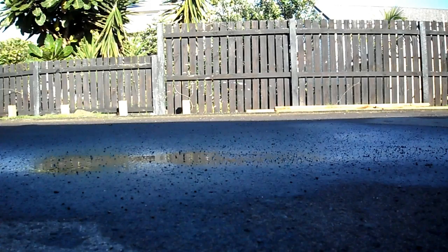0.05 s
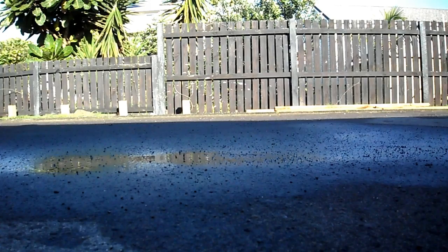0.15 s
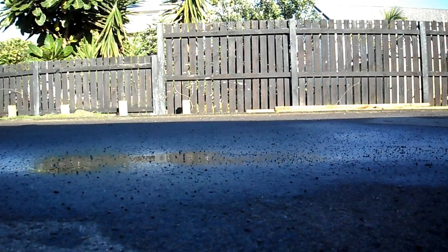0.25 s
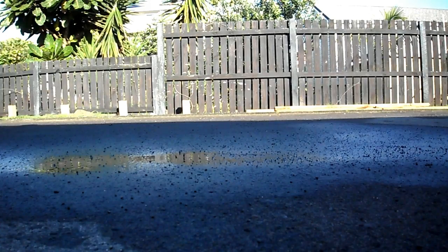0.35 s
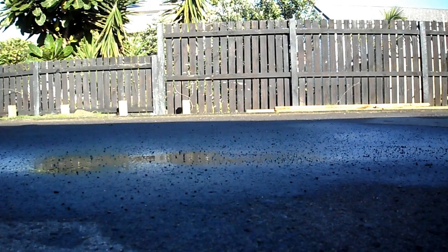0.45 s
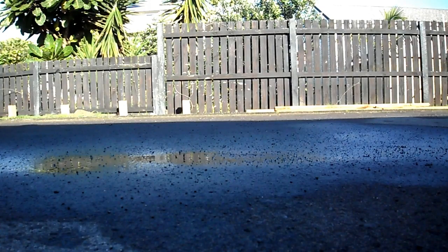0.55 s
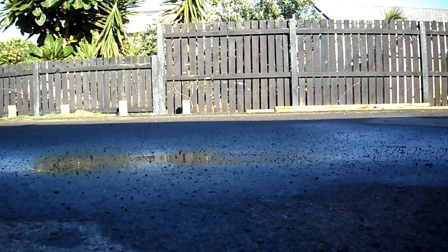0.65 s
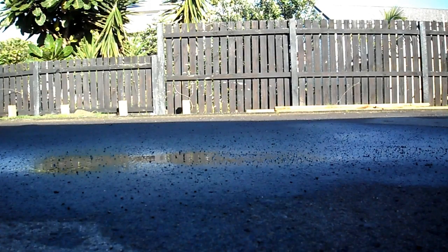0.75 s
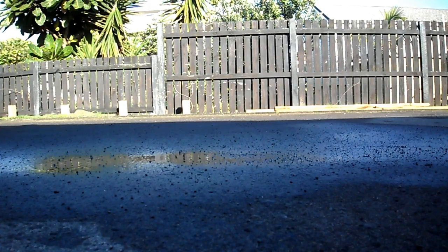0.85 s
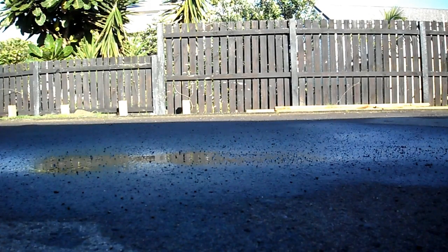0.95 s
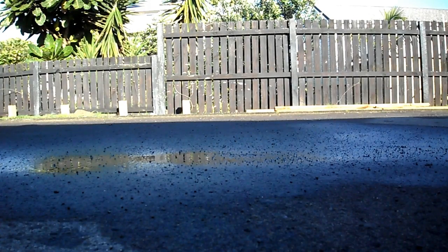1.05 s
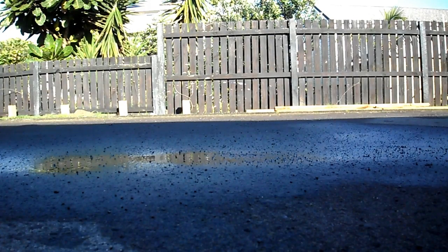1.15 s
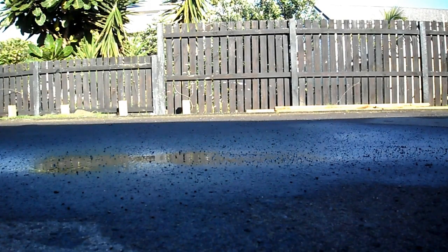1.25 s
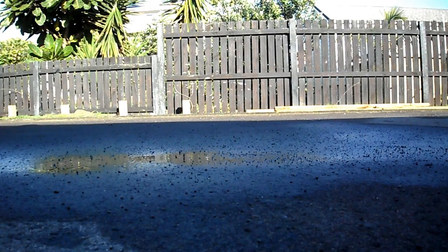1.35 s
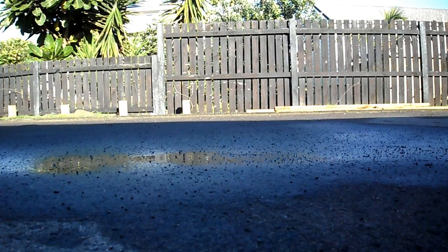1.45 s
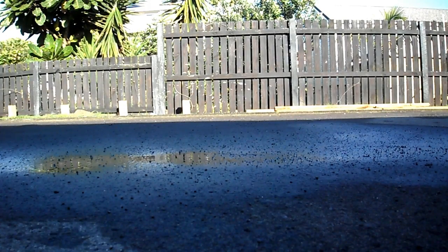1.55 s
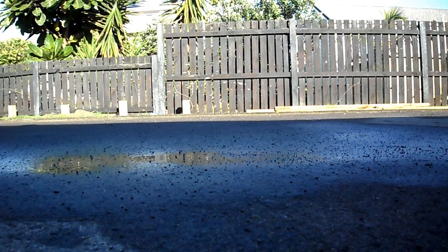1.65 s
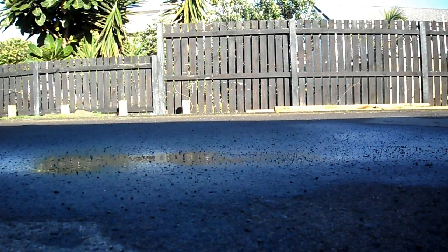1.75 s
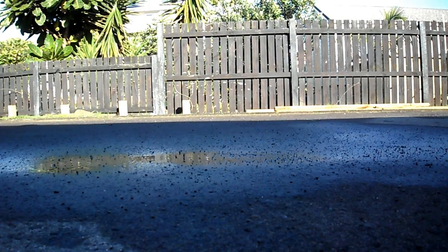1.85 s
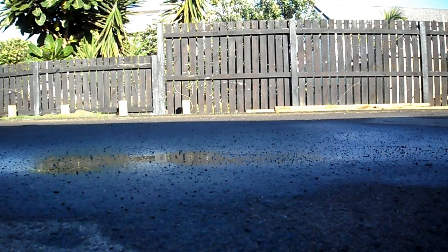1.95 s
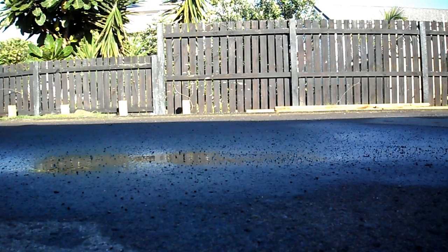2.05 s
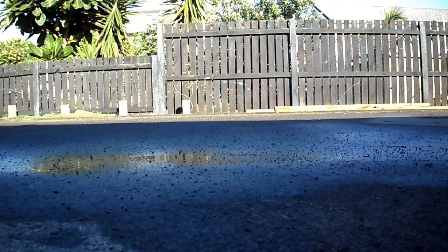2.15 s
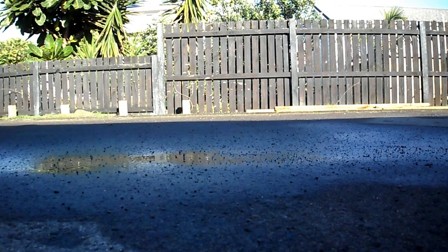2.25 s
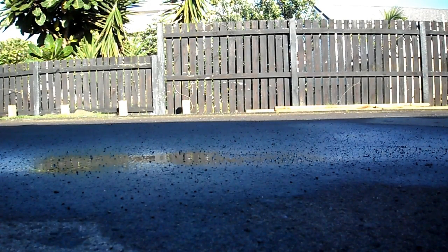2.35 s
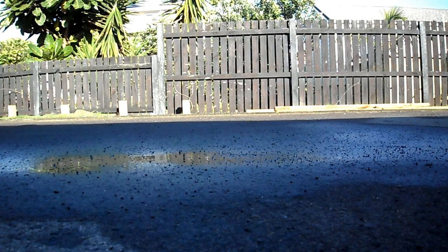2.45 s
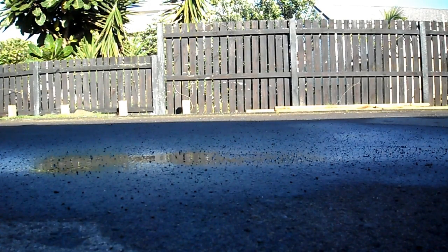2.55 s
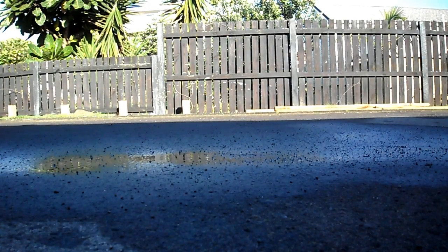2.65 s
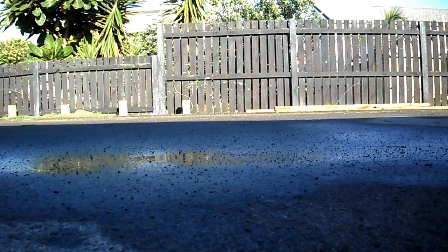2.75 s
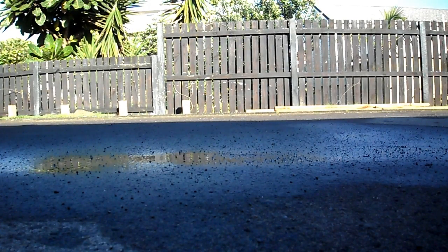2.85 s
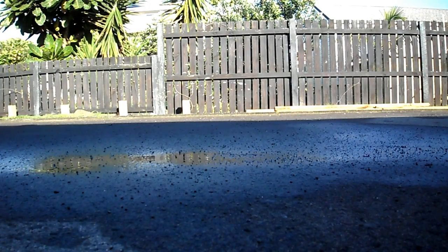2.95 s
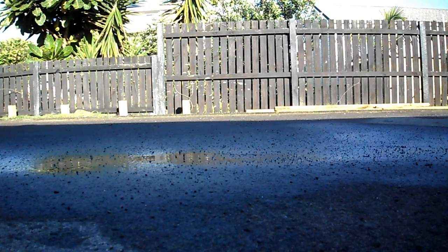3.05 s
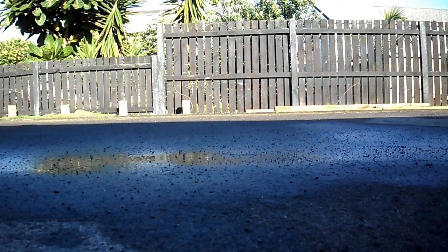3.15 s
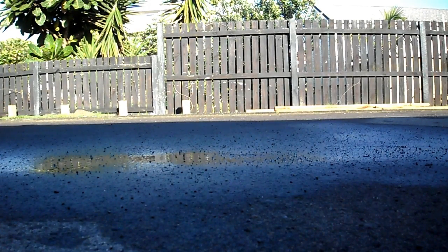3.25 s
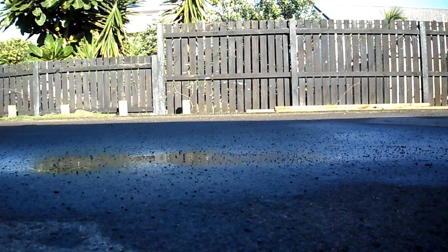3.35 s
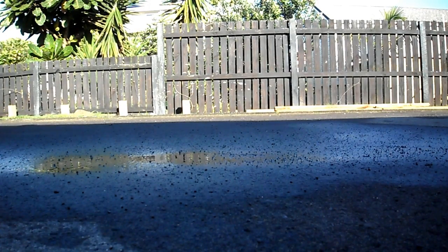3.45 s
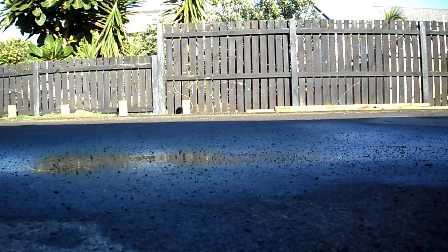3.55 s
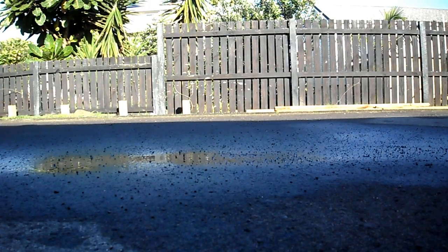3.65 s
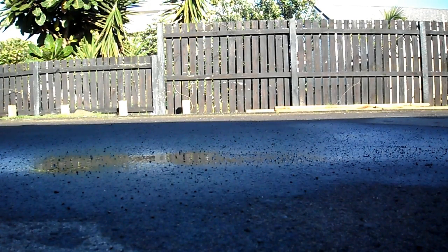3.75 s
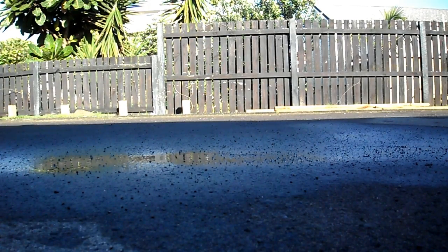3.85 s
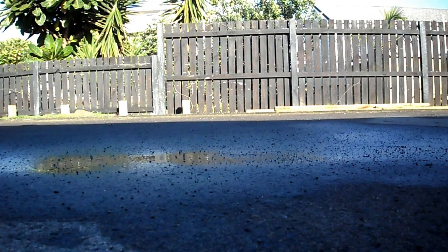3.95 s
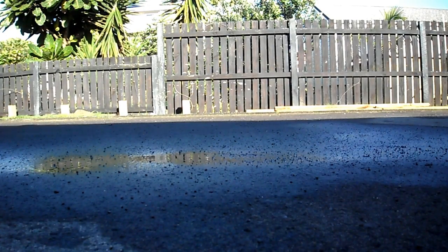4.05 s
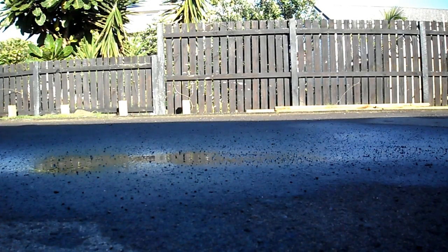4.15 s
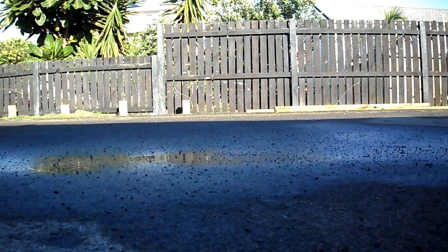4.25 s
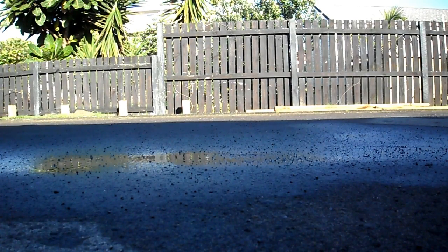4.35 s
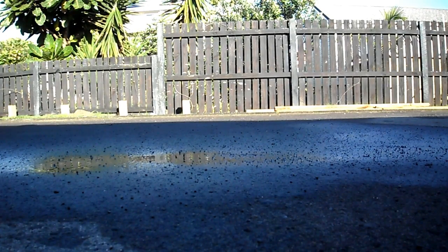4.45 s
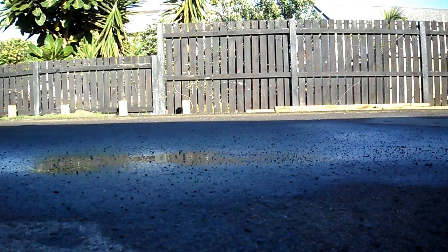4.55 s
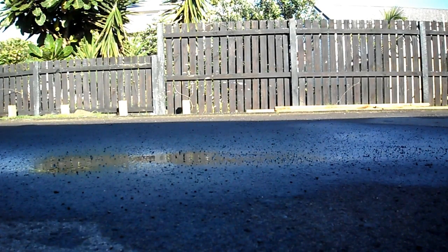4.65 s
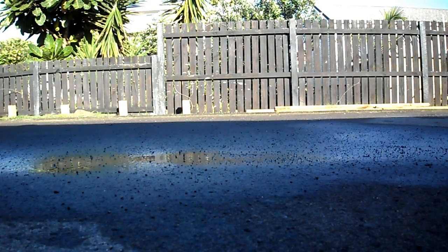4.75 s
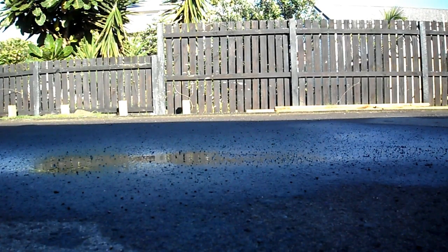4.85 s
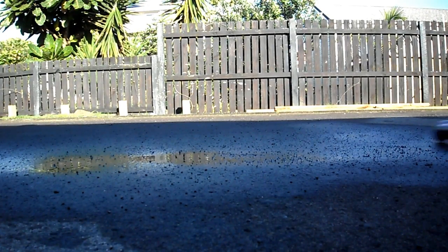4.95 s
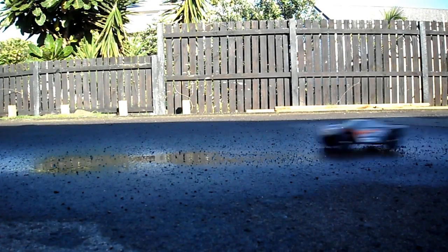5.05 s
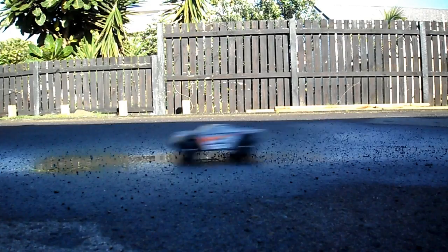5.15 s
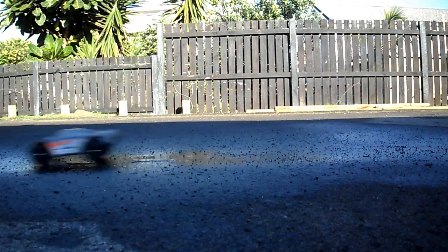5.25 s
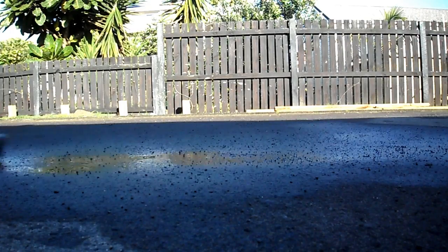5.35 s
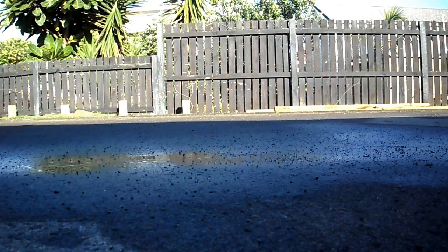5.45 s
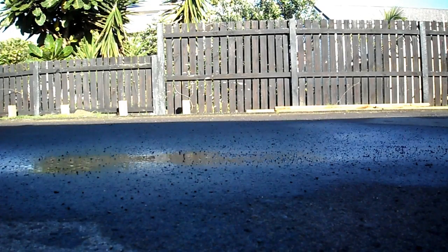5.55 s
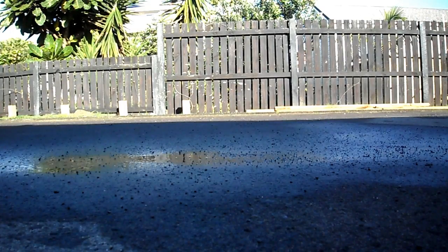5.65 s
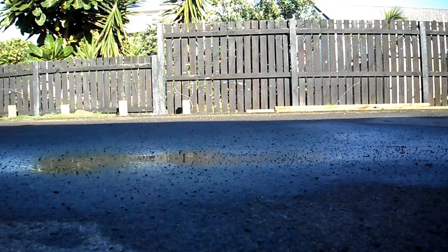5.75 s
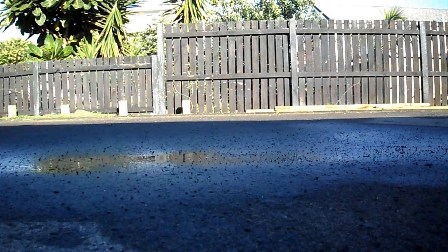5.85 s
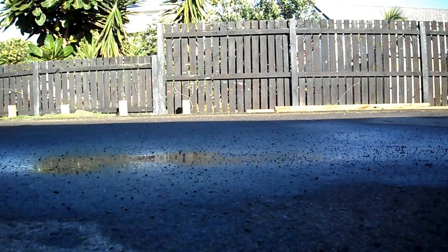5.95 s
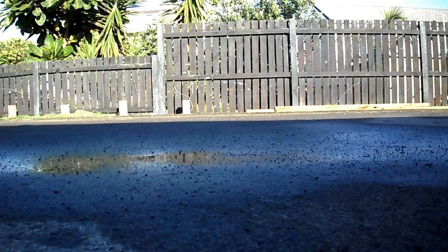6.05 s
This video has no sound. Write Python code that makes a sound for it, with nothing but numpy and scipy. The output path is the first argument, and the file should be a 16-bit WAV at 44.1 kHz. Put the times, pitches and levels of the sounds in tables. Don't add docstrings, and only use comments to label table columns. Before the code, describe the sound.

A quiet open yard, with soft low town rumble and faint hiss throughout. From 0 to 0.6 s a small electric model truck far away revs upward, a thin gear whine with light plastic rattle. Tiny gritty ticks and bird chirps come at about 0.65-1.0 s, then the rattle fades. More quick chirps sound at 2.3-2.9 s. From 3.0 s the whine climbs again, swelling to a high, buzzing pitch by 4.0-4.3 s, dips slightly, and holds steady with a faint controller hum. At 4.8 s tyres break into a piercing, fluttering squeal, strongest near 5.07 s, passing very close until 5.2 s. Dense grit knocks, short squeaks and wet spatter follow, loudest around 5.3 s. At 5.5-5.8 s the whine drops under braking, then shoots up as wheels spin, with scattered knocks and small squeaks to the end just after 6 s. A short dull fence echo trails the sounds.

```python
import sys
import numpy as np
from scipy import signal
from scipy.fft import rfft, irfft
from scipy.io import wavfile
from scipy.ndimage import uniform_filter1d

SR = 44100
rng = np.random.default_rng(int(sys.argv[2]) if len(sys.argv) > 2 else 0)


def voltage_ratio(decibels):
    exponent = np.asarray(decibels, float) / 20
    return 10 ** exponent


def digitize_waveform(pressure):
    field = np.atleast_2d(pressure).T
    bounded = np.clip(field, -1, 1)
    quanta = np.round(bounded * 32767).astype(np.int16)
    wavfile.write(sys.argv[1], SR, quanta)


N = 269010
T = np.arange(N) / SR

# frequency in Hz, level in dB per Hz.
TOWN_SPECTRUM = [(12, -45), (20, -8.5), (107, -1), (246, 0), (442, -3), (888, -9.5), (1020, -9),
                 (1140, -13.5), (1890, -22), (3690, -33), (4120, -46), (5300, -38), (11900, -34),
                 (14500, -32), (15700, -36)]
TOWN_DB = -58

# first stroke in s, last stroke in s, low Hz, high Hz, level in dB.
TRILLS = [
    (.672, .72, 3800, 4700, -66),
    (2.277, 2.307, 2900, 4700, -66.5),
    (2.745, 2.795, 3000, 5000, -70.5),
]
STROKE_S, STROKE_GAP_S, FIRST_STROKE_DROP_HZ = .023, .016, 650
# start in s, length in s, start Hz, end Hz, level in dB.
PEEPS = [ (.75, .03, 4950, 5100, -76), (.66, .03, 2600, 2570, -66), (.735, .025, 2500, 2480, -67),
         (.815, .025, 2520, 2500, -61), (.88, .02, 2550, 2500, -65), (.99, .025, 2600, 2550, -67),
         (2.325, .04, 4400, 4300, -75), (2.365, .012, 3100, 2600, -68), (2.375, .024, 2650, 3600, -64),
         (2.392, .032, 2650, 3750, -63), (2.413, .024, 3300, 3900, -65), (2.505, .03, 4250, 4150, -71),
         (2.575, .04, 4250, 4200, -74), (2.645, .09, 4200, 4150, -79), (2.848, .03, 3150, 4050, -65.5),
         (2.88, .036, 3250, 4450, -65)]

# time in s, level in dB.
HUM = [(2.87, -64), (2.89, -61.5), (3.43, -55), (3.59, -53.5), (4.2, -66), (4.32, -91), (4.42, -48),
       (4.66, -78), (4.751, -41)]
HUM_HZ = 1397

# time in s, peak in dB, chassis knock against it in dB, scatter in s.
GRIT_BUMPS = [(.672, -52, -6, .008), (.752, -55, -6, .01), (.824, -51, -9, .01), (.89, -55, -6, .008),
              (4.349, -45, 3, 0.006), (4.6892, -36, -10, 0.006), (4.7578, -29, -2, 0.006),
              (5.0855, -22, -4, 0.006), (5.223, -20, -3, 0.006), (5.2485, -23, -3, 0.0044),
              (5.2749, -17, 2, 0.0068), (5.29, -23.5, 3, 0.0087), (5.311, -13, -6, 0.0048),
              (5.338, -17, -4.5, 0.0051), (5.365, -15, -3.5, 0.0066), (5.399, -18, 1, 0.0069),
              (5.4344, -25, 9, 0.0068), (5.469, -21.5, 1, 0.006), (5.4984, -46, -5, 0.006),
              (5.5146, -29, 1, 0.0089), (5.5624, -28, 2, 0.0045), (5.6032, -37, 1, 0.005),
              (5.6685, -30, -4, 0.0092), (5.7184, -30, 5.5, 0.0067), (5.8351, -28, -2, 0.0033),
              (5.8994, -40, -7, 0.0052), (5.9738, -38, 0, 0.006), (6.0003, -36, 2, 0.0074)]
GRIT_HISS = [(3500, -31), (5000, -10), (7000, -14), (10000, -23), (13000, -25), (15800, -25)]
SPLASH_DB, SPLASH_S = -29, 0.0058

# start in s, length in s, start Hz, end Hz, level in dB.
SQUEAKS = [ (5.21, .065, 3750, 3500, -35), (5.243, .04, 2550, 2150, -31), (5.392, .024, 3150, 2850, -30),
           (5.425, .022, 2750, 2950, -32), (5.468, .016, 3000, 3600, -33), (5.5, .014, 3800, 4000, -37),
           (5.515, .025, 3000, 3250, -38), (6.028, 0.021, 3110, 3100, -33.5),
           (6.063, 0.0074, 3270, 3010, -23), (6.088, 0.014, 3200, 3050, -33)]
# time in s, pitch in Hz, level in dB.
REAR_TREAD = [(4.95, 3100, -44), (5.02, 2990, -41), (5.035, 3150, -37), (5.052, 2900, -38),
              (5.069, 3050, -42.5), (5.089, 2850, -45), (5.12, 3114, -34.5), (5.161, 3290, -39),
              (5.199, 3140, -56)]
# time in s, pitch in Hz, level in dB.
FRONT_GRIPS = [(4.833, 3124, -24), (4.858, 3150, -27.5), (4.894, 3560, -30.5), (4.922, 3830, -27.5),
               (4.946, 3750, -26), (4.965, 4200, -27), (4.98, 3820, -25), (5.009, 3850, -20.5),
               (5.026, 3950, -24), (5.044, 3880, -19.5), (5.061, 3910, -21.5), (5.074, 3910, -16.5),
               (5.091, 3900, -29), (5.11, 4200, -25), (5.124, 3980, -27), (5.155, 4250, -24),
               (5.187, 3950, -34)]
GRIP_SHARE, GRIP_SAG_HZ = .34, 160
SQUEAL_OCTAVE_DB = -22

# start in s, end in s, resonance in Hz, width in Hz, level in dB.
PANELS = [ (0.77, 2.4, 3250, 190, -79), (3.44, 4.6, 6600, 270, -60.5), (3.4, 4.7, 3380, 300, -54.5),
          (4.25, 4.9, 2030, 80, -50.5), (3.13, 4.5, 3900, 140, -58.5), (5.24, 5.4, 1150, 270, -39),
          (5.1, 5.42, 700, 450, -45), (.2, .56, 1420, 90, -65), (.2, .4, 1620, 200, -66),
          (3.35, 3.9, 5950, 300, -63), (4.3, 4.75, 10000, 1500, -60), (4.82, 4.96, 6250, 250, -47),
          (4.97, 5.2, 5300, 1200, -41), (4.86, 5.0, 6950, 300, -46), (5.47, 5.8, 6900, 250, -51),
          (5.84, 6.15, 7100, 350, -51)]

# time in s, nearness in dB, wetness of the ground in dB.
RUNS = [
    [(0, -69, -19), (.06, -69, -18), (.2, -61.5, -28), (.4, -57, -12), (.6, -59.5, -13), (.8, -64, -12),
     (1.2, -62.5, -18), (2.0, -68.5, -18), (2.6, -73.5, -10)],
    [(3.02, -69.5, -17), (3.09, -61.5, -19), (3.4, -51, -17), (3.66, -47, -14.5), (4.0, -43.5, -16.5),
     (4.11, -42, -5), (4.2, -42.5, -8), (4.27, -45.5, -17.5), (4.54, -44.5, -13.5), (4.74, -44.5, -15),
     (4.84, -35, -16), (4.92, -33, -9.5), (5.17, -29.5, -12.5), (5.27, -33, -10), (5.37, -35.5, -16),
     (5.63, -39.5, -32), (5.8, -48, -17), (5.9, -39, -19.5)],
]
# frequency in Hz, level in dB.
BOOM = [(40, -12), (100, -4.5), (250, -2.5), (500, 0.5), (800, 0), (1000, -13), (1200, -50)]
# centre in Hz, width in Hz, level in dB.
SHELL = [(1255, 700, 17.5), (1350, 530, 11.5), (1440, 73, -12)]
CHASSIS = [(2038, 59, 0.5), (2390, 730, 5), (2710, 180, -3), (3270, 1060, 2.5), (3830, 260, 2.5),
           (4250, 50, -1), (3100, 2870, 15.5)]
MOTOR_CAN = [(4950, 85, -10), (6125, 560, -1.5), (6870, 500, 5), (6150, 3550, 12)]
# frequency in Hz, level in dB.
DROPS = [(7500, 7.5), (8700, 10), (10000, 6.5), (11500, 1.5), (13000, -17)]
MIST = [(10000, -24), (12000, 3), (14000, 2), (15800, -3)]
NEAR_DB = -40
BOOM_DB, BOOM_FOLLOWS = -52, 0.49
SHELL_DB, SHELL_FOLLOWS = -43.5, 0.92
CAN_DB, MIST_DB = -11.5, -8
POWER_SHELL_DB, POWER_CAN_DB = 2, 2.5

# time in s, tooth mesh rate in Hz, whine level in dB.
BURSTS = [
    [(.04, 980, -67), (.16, 1273, -66), (.244, 1630, -65), (.35, 1913, -75), (.49, 2204, -67),
     (.57, 2180, -72)],
    [(3.04, 1100, -69), (3.13, 1229, -60), (3.2, 1330, -57), (3.29, 1660, -63), (3.386, 1944, -64.5),
     (3.6, 2296, -57.5), (3.92, 2860, -66), (4.0, 2904, -51.5), (4.26, 2864, -54)],
    [(4.3, 2490, -69), (4.44, 2567, -55), (4.55, 2575, -54.5), (4.7, 2575, -65), (4.82, 2510, -42.5)],
    [(5.5, 1634, -69), (5.525, 1580, -42.5), (5.6, 1309, -50), (5.68, 1135, -49), (5.77, 978, -48.5)],
    [(5.817, 1411, -38), (5.836, 1519, -49), (5.87, 1780, -47), (5.905, 2000, -45.5), (5.925, 2200, -49),
     (5.95, 2400, -47), (5.985, 2534, -44), (6.1, 2850, -54)],
]
BURST_OCTAVE_DB = [3, 3, 2, -7, -4]
# centre in Hz, width in Hz, lift in dB.
WHINE_PEAKS = [(1250, 126, 9), (1580, 195, 9), (2000, 150, 10.5), (2540, 90, -7), (3550, 200, 10),
               (3950, 510, 17), (5040, 720, 4.5)]
SPUR_TEETH = 60
OCTAVE_DB, OCTAVE_DB_PER_KHZ = -5, 12
AXLE_DB, AXLE_DB_PER_KHZ = -4, 2


def level(x):
    return x / np.sqrt(np.mean(x ** 2))


def colour(x, table):
    hz, db = np.transpose(table)
    f = np.fft.rfftfreq(len(x), 1 / SR) + 1
    gain = voltage_ratio(np.interp(np.log(f), np.log(hz), db, left=-70, right=-70))
    return level(irfft(rfft(x) * gain, len(x)))


def walk(rate):
    k = int(SR / rate)
    steps = np.repeat(rng.standard_normal(N // k + 1), k)
    return 1.3 * uniform_filter1d(uniform_filter1d(steps, k), k)[:N]


def gate(s, fade=0.008):
    return np.clip(np.minimum(T - s[0], s[-1] + .5 * fade - T) / fade + .5, 0, 1)


def turns(hz):
    return np.cumsum(hz) * 2 * np.pi / SR


def tone(phase, db):
    return np.sqrt(2) * voltage_ratio(db) * np.sin(phase)


def grains(rough):
    return voltage_ratio(rough * np.minimum(rng.exponential(size=N), 6)) * rng.standard_normal(N)


def ring(x, modes, sway_db=.9):
    out = 0
    for hz, width, db in modes:
        b, a = signal.iirpeak(hz, hz / width, SR)
        mode = signal.lfilter(b, a, signal.lfilter(b, a, x))
        out = out + voltage_ratio(db + sway_db * walk(15)) * level(mode)
    return level(out)


def glides(table, rough, fullness):
    out, wobble = np.zeros(N), walk(240)
    for s, length, start_hz, end_hz, db in table:
        i, n = int(s * SR), int(length * SR)
        u = np.arange(n)[:N - i] / n
        hz = end_hz - (end_hz - start_hz) * (1 - u) ** ((end_hz / start_hz) ** 1.8)
        shape = np.sin(np.pi * u) ** fullness * voltage_ratio(3.5 * wobble[i:i + n])
        out[i:i + n] += shape * tone(turns(hz * (1 + rough * wobble[i:i + n])), db)
    return out


def town():
    return voltage_ratio(TOWN_DB + 0.09 * walk(5.2)) * colour(rng.standard_normal(N), TOWN_SPECTRUM)


def fence(x, t60=.4):
    u = T[:SR // 2]
    tail = rng.standard_normal(len(u)) * np.exp(-np.log(1000) * u / t60) * (u > .012)
    tail = uniform_filter1d(tail, size=3)
    return signal.fftconvolve(x, tail / np.sqrt(np.sum(tail ** 2)))[:N]


def birds():
    strokes = []
    for first, last, low_hz, high_hz, db in TRILLS:
        for s in np.linspace(first, last, round((last - first) / STROKE_GAP_S) + 1):
            start_hz = low_hz - FIRST_STROKE_DROP_HZ * (s == first)
            strokes.append((s, STROKE_S, start_hz, high_hz, db))
    return glides(strokes + list(PEEPS), .008, .4)


def controller():
    s, db = np.transpose(HUM)
    command_db = 4 * np.sin(2 * np.pi * 50.3 * T)
    phase = turns(HUM_HZ * (1 + 0.0047 * walk(72)))
    return gate(s) * tone(phase, np.interp(T, s, db) + command_db + 3 * walk(60))


def grit():
    spray, knock = np.zeros(N), np.zeros(N)
    for s, db, knock_db, scatter in GRIT_BUMPS:
        u = np.clip(T - s + .003, 0, None) / scatter
        shape = (u * np.exp(1 - u)) ** 3
        spray += voltage_ratio(db - 13.5) * shape
        knock += voltage_ratio(db + knock_db - 11) * shape
    return spray * colour(grains(3), GRIT_HISS) + ring(grains(2), SHELL + CHASSIS) * knock


def stick_slip(hz, db, rough):
    phase = turns(hz * (1 + rough * walk(300)))
    db = db + 170 * rough * walk(200)
    return tone(phase, db) + tone(2 * phase, db + SQUEAL_OCTAVE_DB + 4 * walk(60))


def front_squeal():
    s, hz, db = np.transpose(FRONT_GRIPS)
    u = (T - s[:, None]) / (GRIP_SHARE * np.gradient(s)[:, None])
    swells = voltage_ratio(db)[:, None] * np.exp(-u ** 2 / 2) + 1e-9
    sag = np.sum(swells * np.tanh(u), axis=0) / swells.sum(axis=0)
    hz = np.interp(T, s, hz) - GRIP_SAG_HZ * sag
    return stick_slip(hz, 20 * np.log10(swells.max(axis=0)), .011)


def rear_squeal():
    s, hz, db = np.transpose(REAR_TREAD)
    return gate(s) * stick_slip(np.interp(T, s, hz), np.interp(T, s, db), .045)


def panels():
    out = 0
    for start, end, hz, width, db in PANELS:
        swell = gate((start, end), 0.074) * voltage_ratio(db + 2.0 * walk(50))
        out = out + swell * ring(grains(0.53), [(hz, width, 0)])
    return out


def splashes():
    s, db = np.array(GRIT_BUMPS)[:, :2].T
    bumps = np.zeros(N)
    bumps[(s * SR).astype(int)] = voltage_ratio(db + SPLASH_DB)
    u = np.arange(-SR // 20, SR // 20 + 1) / SR
    return signal.fftconvolve(bumps, np.exp(-(u / SPLASH_S) ** 2), "same")


def rolling():
    shake = walk(45)
    chassis = ring(grains(3.0), CHASSIS) * voltage_ratio(0.21 * shake + 1.24 * walk(90))
    boom = colour(grains(0.43), BOOM)
    shell = ring(grains(1.73), SHELL) * voltage_ratio(1.07 * shake + 1.3 * walk(110))
    can = ring(grains(3.5), MOTOR_CAN) * voltage_ratio(1.3 * shake + 1.0 * walk(150))
    patter = .9 * shake + 1.5 * walk(40) + 1.2 * walk(90)
    mist = voltage_ratio(MIST_DB + 1.2 * walk(120)) * colour(grains(3.6), MIST)
    spray = (colour(grains(3.3), DROPS) + mist) * voltage_ratio(patter)

    power = np.clip(sum(gate((run[0][0], run[-1][0]), 0.041) for run in BURSTS), 0, 1)
    s, db, wet_db = np.vstack(RUNS).T
    db, wet_db = np.interp(T, s, db), np.interp(T, s, wet_db)
    can = voltage_ratio(CAN_DB + POWER_CAN_DB * power) * can
    boom = voltage_ratio(BOOM_DB + BOOM_FOLLOWS * (db - NEAR_DB)) * boom
    shell = voltage_ratio(SHELL_DB + SHELL_FOLLOWS * (db - NEAR_DB) + POWER_SHELL_DB * power) * shell
    return voltage_ratio(db) * (chassis + can + voltage_ratio(wet_db) * spray) + boom + shell + splashes() * spray


def shell_lift(hz):
    return sum(db / (1 + (2 * (hz - centre) / width) ** 2) for centre, width, db in WHINE_PEAKS)


def gears(table, octave_db):
    s, hz, db = np.transpose(table)
    hz, db = np.interp(T, s, hz), np.interp(T, s, db)
    octave_db = octave_db + OCTAVE_DB + OCTAVE_DB_PER_KHZ * np.minimum(hz / 1000 - 2, 0)
    spur = turns(hz / SPUR_TEETH)
    phase = turns(hz * (1 + .015 * walk(200) + .007 * np.cos(spur)))
    throb_db = db + 3 * np.sin(spur)
    whine = tone(phase, throb_db + shell_lift(hz) + 3 * walk(170))
    octave = tone(2 * phase, throb_db + octave_db + shell_lift(2 * hz) + 3 * walk(170))
    axle_db = db + AXLE_DB + AXLE_DB_PER_KHZ * (hz / 1000 - 2.5) + 4 * walk(60)
    return gate(s) * (whine + octave + tone(3 * phase / 2, axle_db))


def scene():
    song = birds()
    tones = controller() + grit() + glides(SQUEAKS, 0.034, 0.64) + front_squeal() + rear_squeal()
    tones = tones + sum(gears(*pair) for pair in zip(BURSTS, BURST_OCTAVE_DB))
    yard = voltage_ratio(-14) * fence(tones) + voltage_ratio(-12) * fence(song)
    return (town() + song + yard + panels() + rolling() + tones)[None]


def roll_off(x):
    return signal.sosfilt(signal.butter(12, 15870, fs=SR, output="sos"), x)


def record(dry):
    return roll_off(dry)


dry = scene()
out = record(dry)
digitize_waveform(out)
```